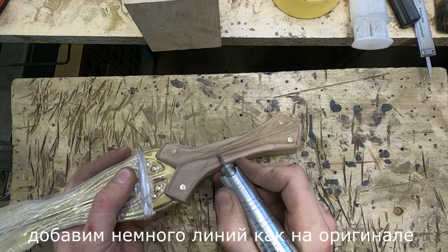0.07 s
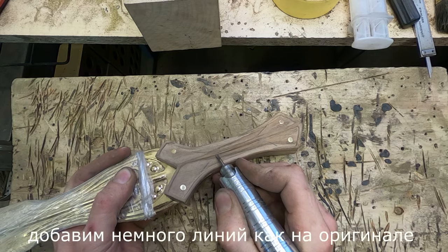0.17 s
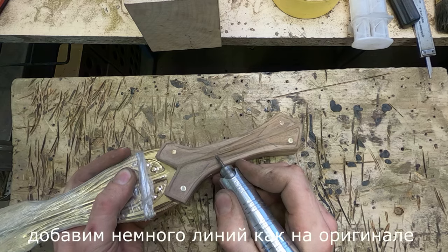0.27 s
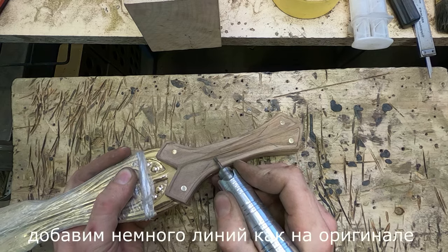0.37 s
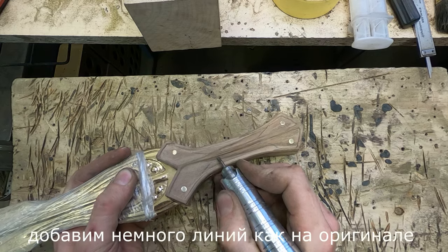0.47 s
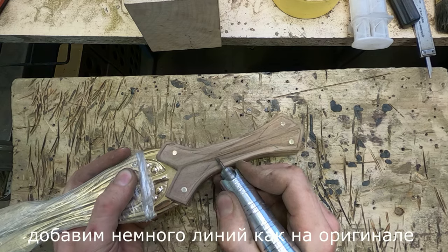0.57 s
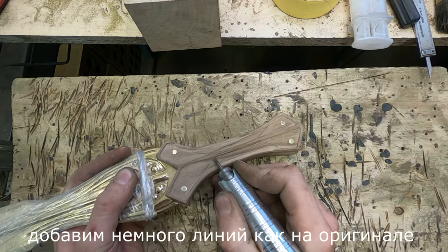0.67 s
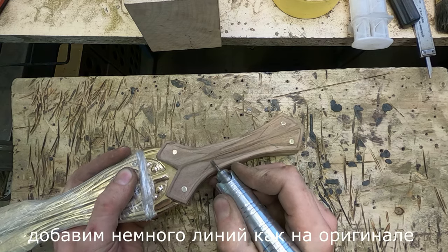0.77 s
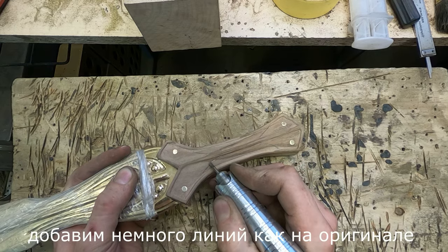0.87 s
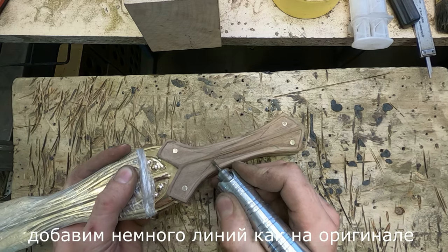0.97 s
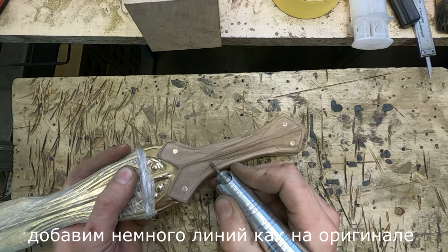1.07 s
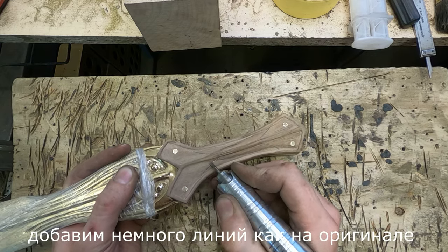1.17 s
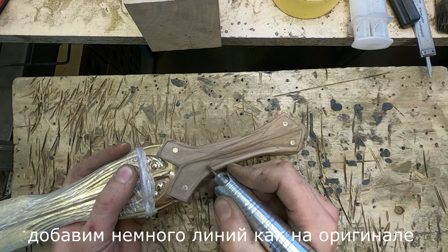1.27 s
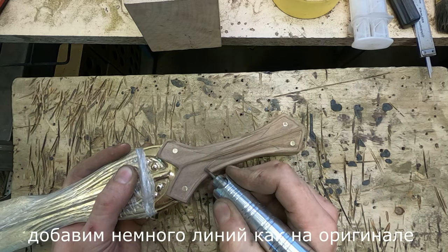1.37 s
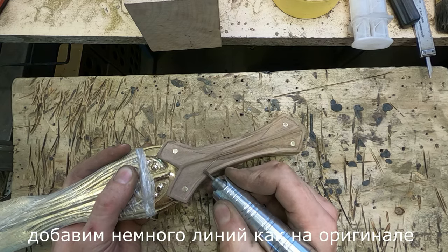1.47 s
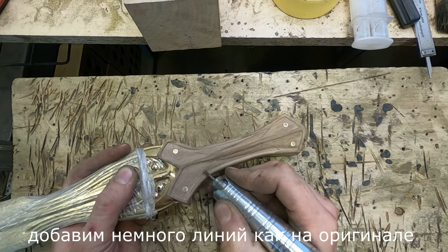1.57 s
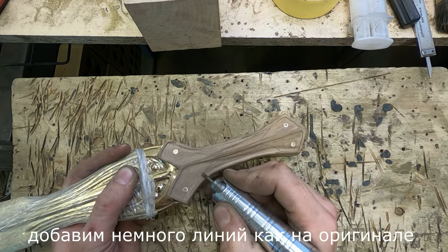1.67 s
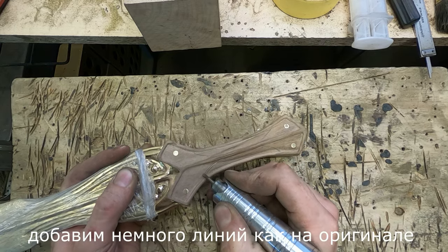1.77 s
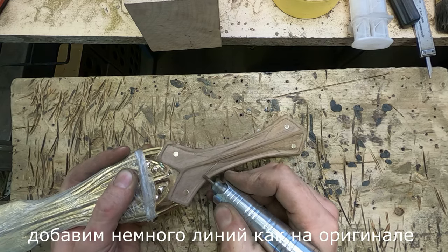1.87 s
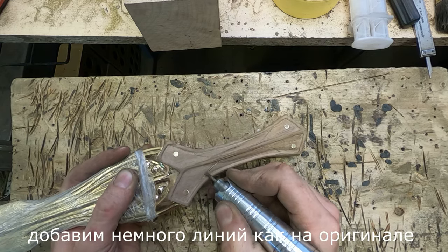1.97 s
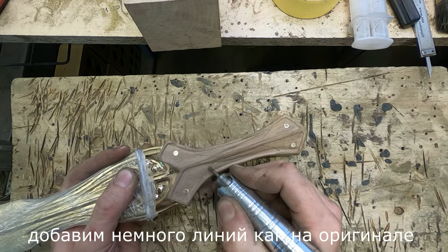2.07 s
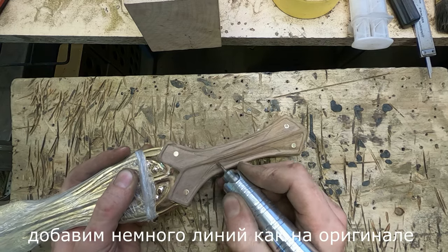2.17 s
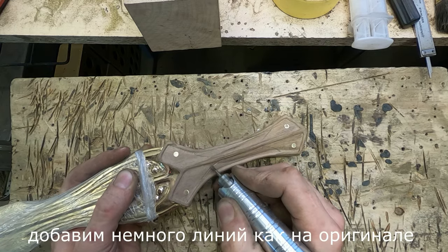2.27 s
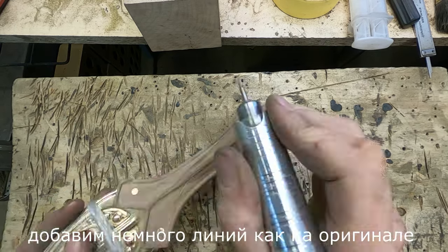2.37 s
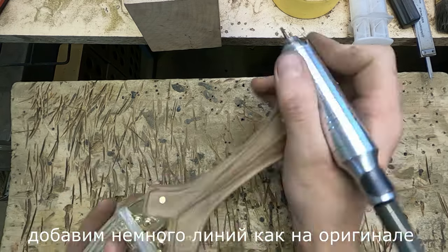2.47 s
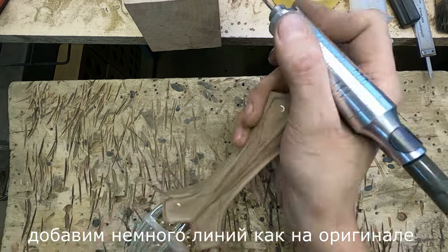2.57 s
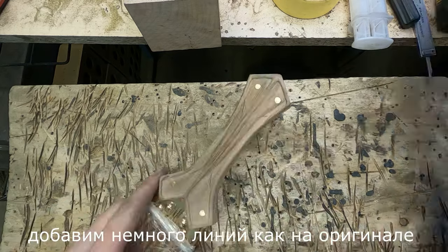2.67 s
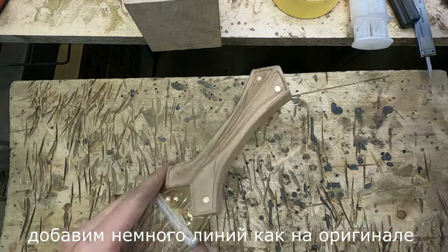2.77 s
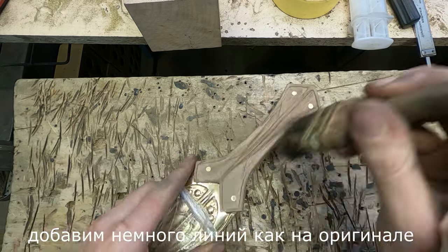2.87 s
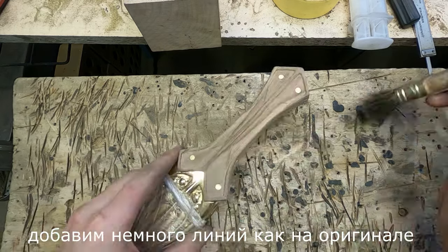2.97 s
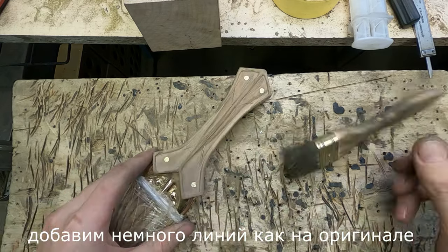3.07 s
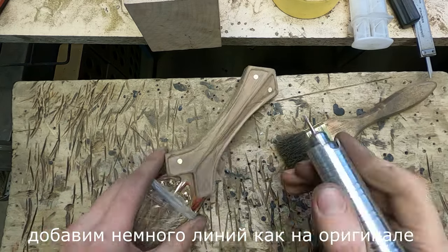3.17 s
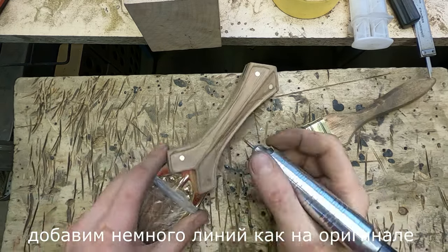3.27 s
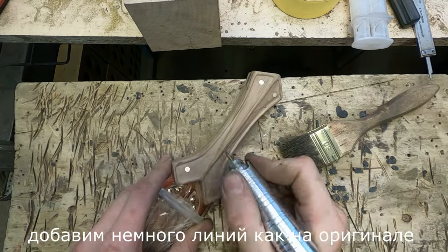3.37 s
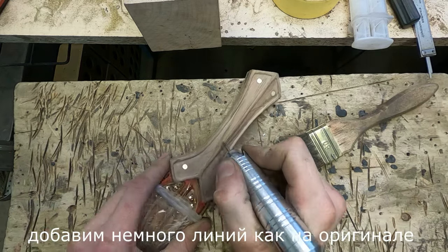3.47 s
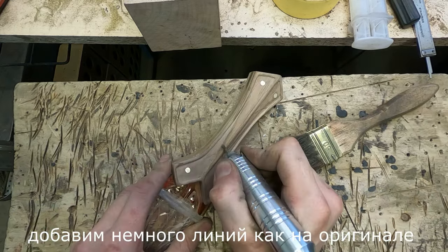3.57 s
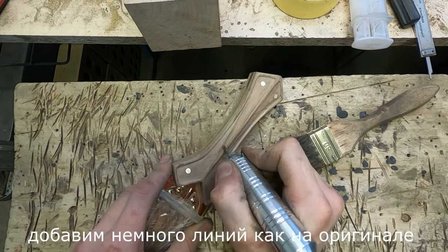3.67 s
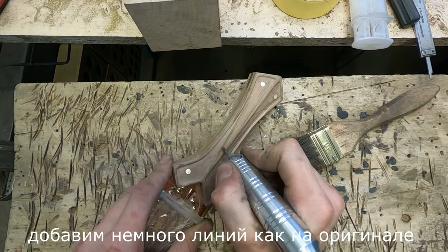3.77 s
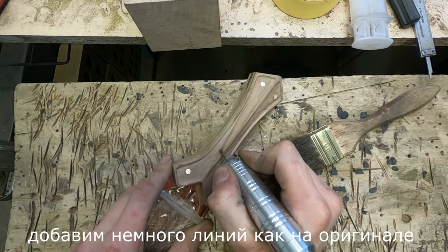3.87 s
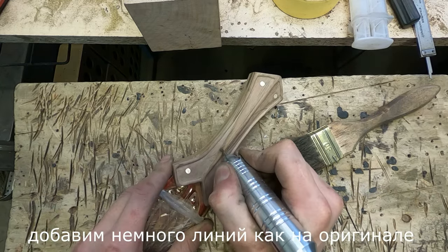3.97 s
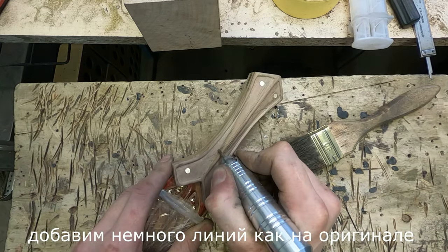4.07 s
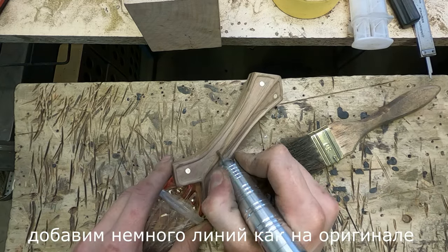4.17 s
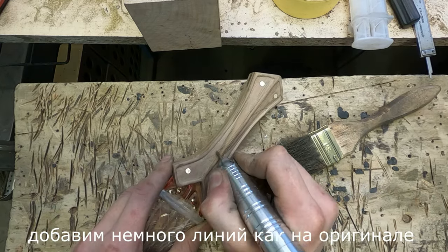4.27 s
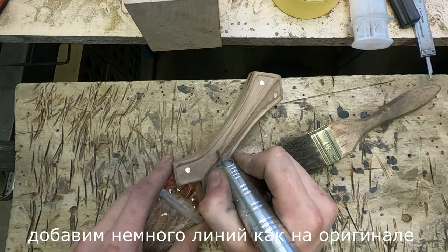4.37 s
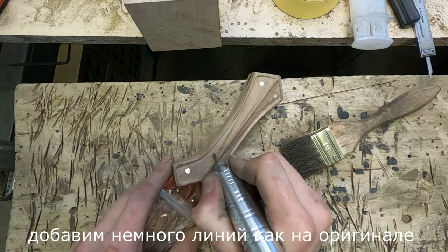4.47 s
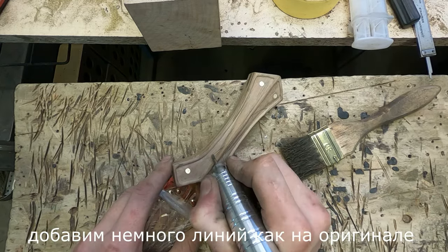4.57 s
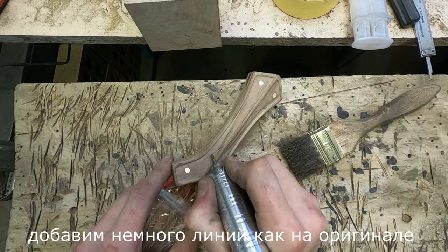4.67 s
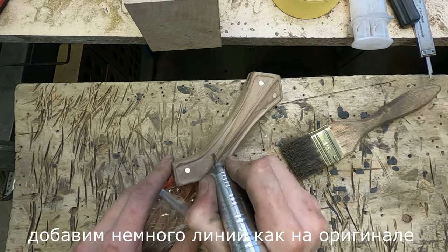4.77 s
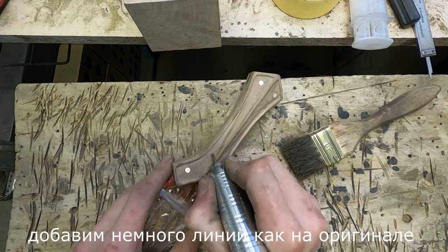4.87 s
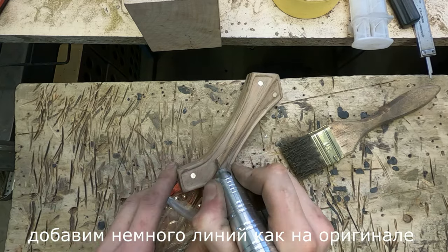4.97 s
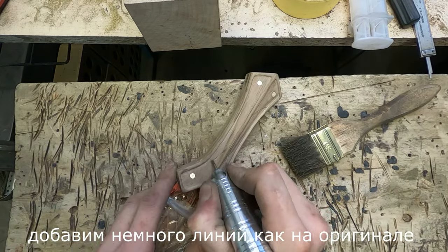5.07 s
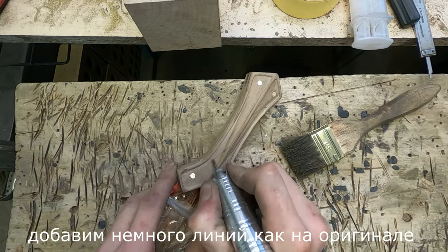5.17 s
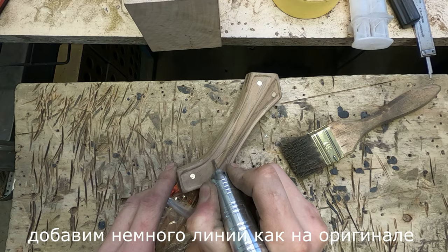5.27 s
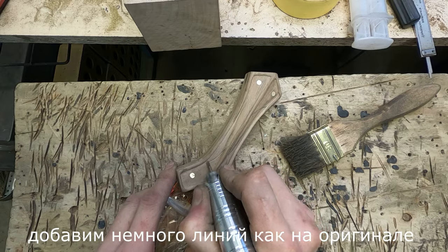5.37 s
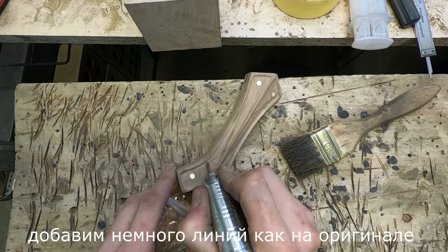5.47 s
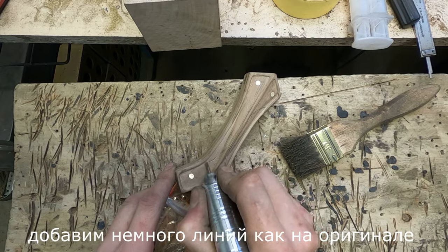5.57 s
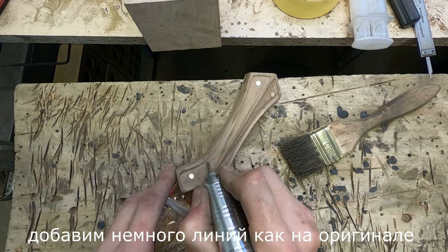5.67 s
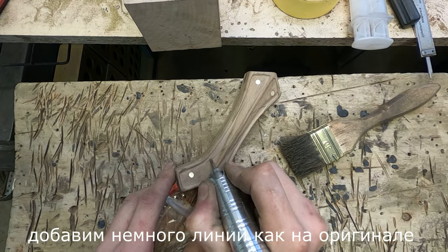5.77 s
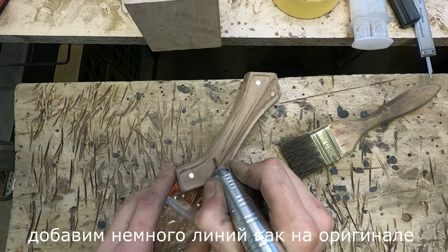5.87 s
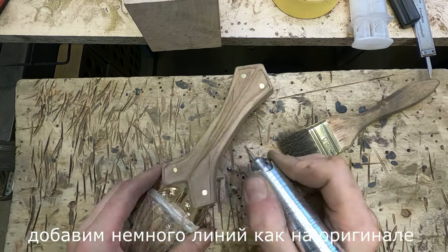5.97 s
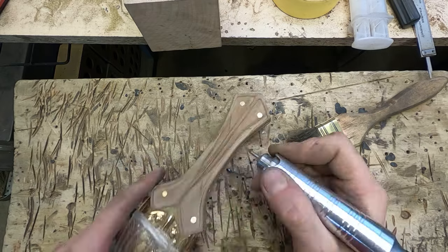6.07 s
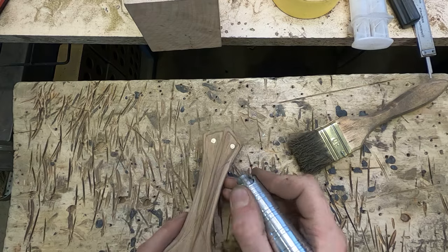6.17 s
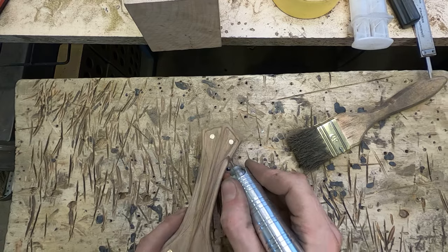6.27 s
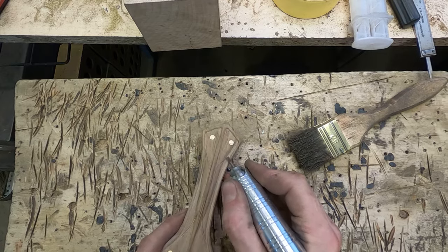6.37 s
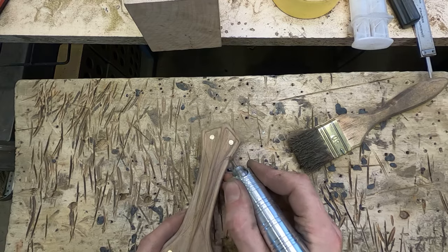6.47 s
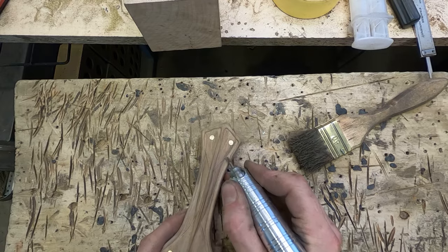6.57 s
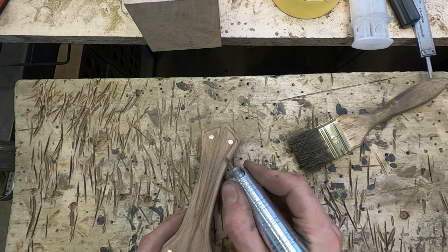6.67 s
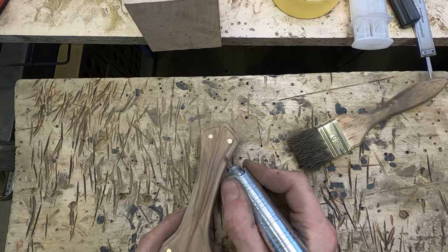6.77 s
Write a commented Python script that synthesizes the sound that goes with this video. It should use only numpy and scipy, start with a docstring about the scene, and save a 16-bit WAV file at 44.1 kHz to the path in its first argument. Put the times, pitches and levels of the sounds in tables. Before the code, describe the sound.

Close high whine of an engraving burr, surging and sagging stroke by stroke with steady hiss, broken by handling knocks and ending in short jabs.

```python
"""A flex-shaft rotary tool engraves lines in a wooden grip, close by on a workbench.
It starts with a low rattle of hum and slapping noise, then a high whine is heard: a row of cosines whose
pitch jumps at each stroke, with a spurt of hiss, and sags, throbbing. Rasp and hiss are shaped noise.
Between the lines the work is turned and brushed (the hiss changes colour), and things knock on the bench:
cracks of noise with ringing sines. Short jabs of the burr and a quiet room complete the scene."""
import sys
import numpy as np
from scipy import signal
from scipy.fft import rfft, irfft, next_fast_len
from scipy.io import wavfile
from scipy.ndimage import uniform_filter1d

SR = 44100
rng = np.random.default_rng(int(sys.argv[2]) if len(sys.argv) > 2 else 0)


def master(y):
    """Save y as 16-bit WAV."""
    cut = np.clip(np.atleast_2d(y).T, -1, 1)
    pcm = np.round(cut * 32767)  # scale
    wavfile.write(sys.argv[1], SR, pcm.astype(np.int16))


N = 300925
T = np.arange(N) / SR  # the time of every sample [s]

# strokes of the burr: (start [s], top pitch [Hz], sag [Hz/s], throbs [1/s], delay of the first crest [s],
# relative throb depth [0-1], relative spurt [dB], relative tone [dB], relative overtones [dB],
# fade of the tone [dB/s])
STROKES = [(.122, 796.4, 600, 28, 0.032, 0.62, -37.5, -44.5, -47.5, 56),
           (.326, 854, 580, 24.6, 0.028, 0.32, -37, -39, -43, 26),
           (.61, 827, 580, 30.4, 0.041, 0.81, -38, -40, -42.5, 53),
           (0.929, 822.6, 560, 25, 0.037, 0.63, -37, -39.5, -43.5, 33),
           (1.196, 842, 600, 33.5, 0.028, 0.63, -37.5, -34.5, -40.5, 54),
           (1.458, 856.6, 540.6, 26.3, .042, 0.7, -38.5, -34, -40.5, 57),
           (1.683, 910.5, 310.1, 25.6, 0.024, 0.45, -37, -35.5, -45.5, 16),
           (1.99, 891, 390, 27, 0.02006, .55, -37, -36.5, -46, -9.5),
           (3.488, 740, 900, 27, 0.033, 0.26, -35.5, -60, -53.5, 28),
           (3.736, 769, 560, 26, 0.04, 0.77, -35, -46, -50.5, 102),
           (4.015, 784.4, 500, 20.8, 0.033, 0.87, -38.5, -51, -51, 48),
           (4.283, 832.4, 550, 25.7, 0.021, 0.5, -39, -49.5, -49, 16),
           (4.557, 861.8, 540, 28.5, .048, 0.71, -38, -44.5, -49, 34),
           (5.13, 755, 600, 24, 0.046, 0.75, -39.5, -57.5, -50, 49),
           (5.316, 822.4, 550, 25.6, 0.033, 0.28, -35.5, -49.5, -48.5, 43),
           (5.698, 793, 560, 23.5, 0.031, 0.44, -38.5, -49, -48, 24),
           (6.339, 717, 500, 27, .03, 0.2, -36, -60, -56, 18),
           (6.688, 760, 300, 18.9, 0.035, 0.2, -33, -60, -56, 20)]
# what the grip radiates of the overtones: (frequency [Hz], relative level [dB])
GRIP = [(200, -28), (340, -7.5), (480, -10), (800, -2), (1150, -9), (1550, 6.5), (1950, 6.5), (2230, -13.5),
        (2550, 10), (2780, -7.5), (3000, -3.5), (3350, -3), (4200, -16), (7450, -5), (8200, -43)]

RATTLE_HZ, RATTLE_END = 108.05, .1035  # the low rattle: slaps per s, end [s]
TURNED_AT = 3  # when the work counts as turned [s]


def gain_of(db):
    """Decibels to amplitude."""
    return 10 ** (np.asarray(db) / 20)


def evened(x):
    """Scales to an rms (average strength) of 1."""
    return x / np.sqrt(np.mean(x ** 2) + 1e-20)


def read(points, hz):
    """Reads a spectrum at the given frequencies, with straight lines over log frequency."""
    f, value = np.transpose(points)
    return np.interp(np.log(hz + 1), np.log(f + 1), value)


def follow(rows):
    """Draws every column of a table over time, sample by sample."""
    s, *columns = np.transpose(rows)
    return [np.interp(T, s, c) for c in columns]


def add(mix, s, sound):
    """Mixes a sound in at a time."""
    part = mix[max(round(s * SR), 0):][:len(sound)]
    part += sound[:len(part)]


def coloured(x, points):
    """Filters a signal by a spectrum and scales it to rms 1."""
    count = x.shape[-1]
    size = next_fast_len(count)
    filter_gain = gain_of(read(points, np.fft.rfftfreq(size, 1 / SR)))
    return evened(irfft(rfft(x, size) * filter_gain, size)[..., :count])


def wander(hz):
    """Smooth random drift: noise with little above the given rate, at rms 1."""
    size = next_fast_len(N)
    smoothing = 1 + (np.fft.rfftfreq(size, 1 / SR) / hz) ** 4
    return evened(irfft(rfft(rng.standard_normal(size)) / smoothing, size)[:N])


def air(spectrum, patchy_db, bright_db=lambda t, hz: 0):
    """Stereo noise at rms 1 with a spectrum, drifting loud and soft patches and a moving colour."""
    # how alike the two sides are: (frequency [Hz], likeness [0-1])
    likeness = [(60, 0.87), (300, 0.99), (1000, 0.94), (2500, 1), (6000, 0.99), (10000, 0.42), (15000, 0.9)]
    # balance of the sides: (frequency [Hz], left minus right [dB])
    balance = [(300, 0), (1500, 0), (5000, 0), (10000, -2), (15000, -2.5)]
    # how far left is ahead of right: (frequency [Hz], phase [rad])
    phase_lead = [(0, 0.014), (7490, 0.05), (8610, 1), (9040, 0.46), (10500, 0.086), (16100, 0.79)]
    frames, hz = N // 128 + 5, np.fft.rfftfreq(512, 1 / SR)
    a, b, c, d, patches = rng.standard_normal((frames, 257, 5)).T
    patches = uniform_filter1d(patches, size=8, axis=1)
    patches = evened(uniform_filter1d(patches, size=2, axis=0))
    level_db = read(spectrum, hz)[:, None] + bright_db(np.arange(frames) * 128 / SR, hz[:, None])
    level_db = level_db + patchy_db * patches
    same = np.clip(read(likeness, hz), -1, 1)[:, None]
    left = a + 1j * b
    right = same * left + np.sqrt(1 - same ** 2) * (c + 1j * d)
    # each side takes half of the level and phase difference
    lean = (gain_of(read(balance, hz) / 2) * np.exp(.5j * read(phase_lead, hz)))[:, None]
    z = np.array([left * lean, right / lean]) * gain_of(level_db)
    return evened(signal.istft(z, nperseg=512, noverlap=384)[1][:, :N])


def workshop(x, wet_db=-22, decay=0.013):
    """Adds milliseconds of scattered reflections, different left and right; bass hardly scatters."""
    t = T[:SR // 8]
    bass_cut = signal.butter(2, 450, "high", fs=SR)
    tail = signal.lfilter(*bass_cut, rng.standard_normal((2, len(t))) * np.exp(-t / decay))
    tail /= np.linalg.norm(tail[0])
    return x + gain_of(wet_db) * signal.oaconvolve(x[None], tail, axes=1)[:, :N]


def rattle(first=0.0055, decay=0.24, between=0.23, growth_db=3):
    """The shaft hums and slaps its sleeve once a turn, harder and harder, as a low rattle."""
    # hum of the shaft: (multiple of the slap rate [1], level [dB])
    hum_parts = [(1, -48.5), (3, -47), (4, -43), (5, -49.5), (6, -66), (7, -54), (8, -46.5), (9, -50),
                 (11, -54)]
    # noise of the slaps: (frequency [Hz], relative level [dB])
    clatter_colour = [(90, -17), (300, -7.5), (700, -16), (1200, -2.5), (1550, -16), (2050, -6), (2500, -3),
                      (3200, 2), (4400, -10), (5800, -5), (7400, -4), (8500, -15), (12000, -16),
                      (15000, -31)]
    turns = RATTLE_HZ * (T - first)
    hum = sum(np.sqrt(2) * gain_of(db) * np.cos(2 * np.pi * (round(k) * turns + rng.random()))
              for k, db in hum_parts)
    # a slap is sudden and dies away before the next
    slaps = uniform_filter1d(between + np.exp(-(turns % 1) / decay), size=30)
    slaps = evened(slaps * gain_of(1.0 * wander(103)))
    force_db = -30 + growth_db * (np.minimum(T / RATTLE_END, 1) - .5)
    clatter = coloured(rng.standard_normal(N), clatter_colour) * slaps * gain_of(force_db)
    heard = np.clip((RATTLE_END - T) / 0.0016, 0, 1)
    return workshop(hum * heard, wet_db=-11, decay=0.017) + workshop(clatter * heard, wet_db=-4, decay=0.015)


def quiet_room():
    """The faint, steady background: low-pitched noise."""
    # room noise: (frequency [Hz], relative level [dB per Hz])
    room_colour = [(25, -15), (80, -3), (170, -0.5), (330, -4.5), (500, -28), (1500, -9), (4000, -23.5)]
    return air(room_colour, patchy_db=1) * gain_of(-81.5)


def spindle(spurt_rise=0.0017, spurt_length=0.038):
    """Pitch, throb and spurts: the pitch jumps at each stroke, then sags steadily towards its resting value."""
    pickup_s, rest_hz = .024, 592.3
    sway = .044  # share of the pitch by which a throb of 1 bends it
    hz, throb, spurt = np.full(N, 1. * rest_hz), np.zeros(N), np.zeros(N)
    for start, top_hz, sag, rate, delay, depth, spurt_db, *_ in STROKES:
        age = np.clip(T - start, 0, 1)
        sagging = np.maximum(top_hz - sag * (age - pickup_s), rest_hz)
        hz += np.minimum(age / pickup_s, 1) * (sagging - hz)
        # each throb is a round crest followed by a brief, sharp snag
        crest = np.pi * abs(np.cos(np.pi * rate * (T - start - delay))) - 2
        throb = np.where(T >= start, 0.814 * depth * crest, throb)
        spurt += gain_of(spurt_db) * np.minimum(age / spurt_rise, 1) * np.exp(-(age / spurt_length) ** 4)
    throb = uniform_filter1d(throb, size=120)
    return hz * (1 + sway * throb), throb, spurt


def pressure():
    """Contact and the strength of tone and overtones: each stroke swells as the burr bites, then changes."""
    # the burr is in the wood: (touches [s], starts to lift [s], weight of the hand [dB])
    cuts = [(.1, 1.742, 0), (1.812, 2.162, 0), (2.214, 2.324, -7), (3.705, 4.756, 0), (4.815, 4.942, 0),
            (5.11, 5.96, 0)]
    touch_s, lift_s, swell_s = 0.029, .024, 0.035
    contact = np.zeros(N)
    for touch, lift, db in cuts:
        held = np.minimum((T - touch) / touch_s, 1 - (T - lift) / lift_s)
        contact += gain_of(db) * np.clip(held, 0, 1) ** 2
    base, upper = np.zeros((2, N))
    for start, *_, tone_db, overtone_db, fade in STROKES:
        age = np.clip(T - start, 0, 1)
        swell, faded_db = np.minimum(age / swell_s, 1), fade * (age - swell_s)
        # the overtones follow only a share of the tone's fade, hardly any once the work is turned
        share = 0.8 if start < TURNED_AT else 0.042
        base += swell * (gain_of(tone_db - faded_db) - base)
        upper += swell * (gain_of(overtone_db - share * faded_db) - upper)
    # the grain of the wood makes the overtones swell and drop out
    grain = gain_of(1.08 * wander(12.7))
    # a light touch loses the fundamental sooner than the overtones
    return contact, contact * base, np.sqrt(contact) * upper * grain


def judder(contact, base, growth=0.11, reference_db=-46.5):
    """The bench shakes under a cut: low noise, a little stronger when the tone is strong."""
    # noise of the bench: (frequency [Hz], relative level [dB per Hz])
    judder_colour = [(25, -22), (90, -25), (220, -29), (325, 12.5), (420, -3), (700, 10), (1200, -17)]
    strength = (abs(base) / gain_of(reference_db) + 1e-9) ** growth
    return air(judder_colour, patchy_db=5.5) * contact * strength * gain_of(-69)


def whine(hz, throb, contact, base, upper, throb_db=5.5, overtone_throb_db=3.5, flutter_db=1,
          tone_db=1.0, overtone_db=-1.5, scrape_db=-4, slip=0.0047):
    """The burr bites twice a turn; when it runs loose the bites differ, half orders appear and it scrapes."""
    # how loosely the burr runs: (time [s], half-order share [1], pitch jitter as a share of the pitch [1],
    # scraping noise [0-1])
    chatter = [(.2, .3, 0.015, 0.27), (1.3, .08, 0.008, 0.15), (2.3, .08, 0.014, 0.41),
               (3.8, .4, .025, 0.41), (4.6, .3, 0.02088, 0.36), (5.25, .9, 0.023, 0.49),
               (5.9, .7, 0.02, 0.3)]
    # the grip once the work is turned and held by its neck: (frequency [Hz], relative level [dB])
    grip_turned = [(200, -32), (360, -9), (520, 1), (1100, -10), (1520, 4.5), (1760, -5), (1950, 9),
                   (2250, -8.5), (2550, 3.5), (3000, 4), (3350, 3), (4000, -7.5), (6500, -17), (7100, -12),
                   (7500, 8), (7900, -0.5), (8400, 1), (9200, -18)]
    loose, jitter, scraping = follow(chatter)
    bite_cycles = np.cumsum(hz * (1 + jitter * wander(256))) / SR
    # each bite lands a little early or late, which smears the high orders
    uneven_bites = bite_cycles + slip * scraping * wander(270)
    overtones, power = np.zeros(N), np.zeros(N)
    for k in np.arange(1, 23) / 2:
        if k != 1:  # the fundamental is made separately below
            before, after = read(GRIP, k * hz[T < TURNED_AT]), read(grip_turned, k * hz[T >= TURNED_AT])
            size = gain_of(np.concatenate([before, after])) * (loose if k % 1 else 1)
            overtones -= size * (1 + 0.42 * wander(60)) * np.cos(2 * np.pi * k * uneven_bites)
            power += size ** 2 / 2
    bite_wave = np.cos(2 * np.pi * bite_cycles)
    tone = -np.sqrt(2) * bite_wave * base * gain_of(tone_db + throb_db * throb)
    overtones *= (1 - scraping ** 2) / np.sqrt(power) * gain_of(overtone_db + overtone_throb_db * throb)
    scrape = air(GRIP, patchy_db=6.0) * scraping * (1 + 1.0 * bite_wave)
    scrape *= gain_of(scrape_db + 0.5 * throb)
    # the fundamental scatters more than the overtones here
    cutting = workshop(tone, wet_db=-27.5) + workshop(upper * overtones, wet_db=-51.0) + upper * scrape
    return cutting * gain_of(flutter_db * wander(90)) + judder(contact, base), bite_cycles


def handling(t, hz):
    """The colour in dB that the moving hands give the hiss: a shaded band and gliding swishes."""
    # the hand's hold shades the hiss around 11 kHz: (time [s], change [dB])
    shade_curve = [(2.3, -5.5), (2.5, -1), (3.5, 0), (4.5, 2), (6.8, 2.5)]
    # swishes while the work is turned and brushed: (time [s], half length [s], centre [Hz],
    # glide [Hz/s], half width [Hz], boost of the band before the hiss is evened out [dB])
    swish_list = [(2.424, 0.044, 10240, -22000, 1098, 10.5), (2.495, .018, 6550, 0, 1200, 12.5),
                  (2.544, 0.058, 13050, 0, 1300, 12), (2.67, 0.061, 12500, -8000, 1200, 13.5),
                  (2.97, 0.094, 10200, 18000, 1300, 9), (3.24, .077, 12130, 8000, 1400, 9)]
    colour_db = np.interp(t, *np.transpose(shade_curve)) * np.exp(-((hz - 11000) / 2200) ** 2)
    for s, length, centre, glide, width, db in swish_list:
        off_centre = (hz - centre - glide * (t - s)) / width
        colour_db = colour_db + db * np.exp(-((t - s) / length) ** 4 - off_centre ** 2)
    return colour_db


def grinding(bite_cycles, throb, spurt, contact, bite=0.59, rasp_db=-1.0, cutting_db=1.5, hiss_db=5.0,
             spurt_db=-0.5):
    """Fibres tear at every bite with a rasp; the spindle hisses, most when it surges."""
    # the running tool: (time [s], relative level of the rasp [dB], relative level of the hiss [dB])
    running = [(0.13, -47.5, -45), (0.33, -47.5, -44.5), (0.97, -47, -46), (1.15, -47, -45),
               (2.2, -49, -44.5), (2.55, -53.5, -44), (2.68, -58, -45), (2.89, -71, -49),
               (3.2, -55.5, -51.5), (3.37, -52.5, -52.5), (3.76, -52, -47), (4.71, -48, -44.5),
               (4.95, -49, -45), (5.78, -44.5, -45), (5.98, -47.5, -46.5), (6.17, -52.5, -51),
               (6.82, -44.5, -49)]
    # noise of the rasp: (frequency [Hz], relative level [dB per Hz])
    rasp_colour = [(2500, -35.5), (3300, -10.5), (4200, -11), (4900, -13), (5300, 1.5), (6400, -0.5),
                   (7200, 1.5), (7480, 4.5), (7850, -9.5), (10000, -4), (13000, -38)]
    # noise of the hiss: (frequency [Hz], relative level [dB per Hz])
    hiss_colour = [(200, -43), (700, -18.5), (1100, -14.5), (2500, -16.5), (4000, -10.5), (6000, -4),
                   (8500, -4), (9800, -2.5), (11000, 4), (12500, 2), (14000, 6.5), (16000, 3)]
    # noise of the spurts: (frequency [Hz], relative level [dB per Hz])
    spurt_colour = [(500, -35.5), (1200, -12), (3000, -15), (6000, -3.5), (7800, -9), (9000, 3.5),
                    (12000, 4), (16000, -0.5)]
    rasp_level, hiss_level = follow(running)
    gate = 1 + bite * np.cos(2 * np.pi * bite_cycles)
    gate = evened(gate * gain_of(1.7 * throb + 0.46 * wander(120)))
    rasp = air(rasp_colour, patchy_db=3.5) * gate * gain_of(rasp_level + rasp_db + cutting_db * contact)
    hiss = air(hiss_colour, patchy_db=2.4, bright_db=handling)
    # evened out over 2000 samples, so that handling changes mainly its colour
    hiss /= np.sqrt(uniform_filter1d((hiss ** 2).mean(0), size=2000))
    hiss *= gain_of(hiss_level + hiss_db + put_aside() + 1.07 * wander(150))
    return rasp + hiss + air(spurt_colour, patchy_db=4.5) * spurt * gain_of(spurt_db)


def bumps():
    """Soft bumps of hands and work: a few low cycles that swell and die away."""
    # bumps: (time [s], level [dB], pitch [Hz])
    bump_list = [(1.306, -57, 317.5), (2.786, -63, 209), (2.971, -53, 330), (2.984, -61, 180),
                 (3.09, -55, 171), (3.104, -56.5, 324), (3.316, -60.5, 170), (3.5, -64.5, 304),
                 (3.86, -61, 162.4), (5.589, -59, 168.3), (6.212, -66, 170), (6.481, -57, 328)]
    out, t = np.zeros(N), T[:SR // 6]
    u = t / 0.009
    for s, db, hz in bump_list:
        add(out, s, gain_of(db) * u * np.exp(1 - u) * np.sin(2 * np.pi * hz * t))
    return out


def knocks(crack_decay=0.005, tail=0.21, tail_decay=0.012, ring=0.32):
    """A knock on the bench is a hard crack of noise with a short tail, and the bench rings in sines."""
    # knocks: (time [s], peak of the crack [dB], brightness [dB per octave], length factor [1])
    knock_list = [(2.606, -23.5, -0.5, 0.51), (2.7498, -29, 12, 0.49), (2.761, -45.5, -4, 3.6),
                  (2.792, -39.5, 1, 1.5), (2.959, -26.5, -2, 0.6), (3.098, -41, -7, 0.91),
                  (3.1364, -23, 8.5, 0.33), (3.143, -35, 1.5, 0.56), (3.153, -35, -3, 0.72),
                  (6.113, -53, -4, 0.73), (6.2116, -27, -1.5, 0.48)]
    # ringing of the bench: (frequency [Hz], relative level [dB], time to fall 60 dB at length factor 1 [s])
    bench = [(618, -12, 0.1), (1103, -2.5, 0.12), (1300, -37, 0.095), (1922, -9.5, 0.21),
             (2570, -12.5, 0.25), (2760, -33, 0.11), (3190, 5.5, 0.013), (3600, -46, 0.085),
             (3854, -21, 0.1)]
    # noise of the crack: (frequency [Hz], relative level [dB per Hz])
    crack_colour = [(30, -49), (100, -22), (200, -10), (400, -16.5), (800, 6.5), (1700, 2), (2100, -2),
                    (2600, 4), (3200, -2), (3800, -4.5), (5000, -19), (9000, -11.5), (16000, -28)]
    out, t = np.zeros(N), T[:SR // 6]
    for s, db, tilt_db, length in knock_list:
        colour = [(f, level + tilt_db * np.log2(f / 1500)) for f, level in crack_colour]
        fade = np.exp(-t / (crack_decay * length)) + tail * np.exp(-t / tail_decay)
        crack = coloured(rng.standard_normal(len(t)), colour) * fade
        modes = sum(gain_of(level - 60 * t / (t60 * length)) * np.sin(2 * np.pi * (f * t + rng.random()))
                    for f, level, t60 in bench)
        add(out, s, gain_of(db) * (crack / abs(crack).max() + ring * modes / abs(modes).max()))
    return out


def put_aside(at=2.727, dip_db=-11, recovery_s=0.056):
    """The hiss drops suddenly as the handpiece is put aside, then recovers: a dip in dB."""
    dip = (T > at) * np.exp(-((T - at) / recovery_s) ** 2)
    return dip_db * uniform_filter1d(dip, size=400)


def jabs(ring_hz=190, jitter=0.037, grit=1.1):
    """The burr pecks at the wood: uneven bites ring whichever part of the grip it meets."""
    # jabs: (time [s], length [s], relative level [dB], pitch at start [Hz], pitch at end [Hz],
    # ringing resonance [Hz], its boost [dB])
    jab_list = [(3.667, 0.039, -49, 566, 522, 1137, 16.5), (5.065, 0.075, -50.5, 652, 555, 1120, 13),
                (6.387, 0.059, -48, 702, 658, 715, 9.5), (6.462, 0.042, -42.5, 654, 627, 2650, -3),
                (6.564, 0.0438, -49.5, 635, 570, 2360, 2), (6.626, 0.035, -45.5, 603, 556, 1130, 21),
                (6.68, 0.052, -48.5, 648, 796, 776, 7.5)]
    out = np.zeros(N)
    f = np.arange(50, 12000, 50)
    for s, length, db, start_hz, end_hz, centre, boost_db in jab_list:
        t = T[:int((length + .03) * SR)]
        hz = np.interp(t, [0, length], [start_hz, end_hz]) * (1 + jitter * wander(360)[:len(t)])
        bite_cycles = np.cumsum(hz) / SR
        bites = evened(sum(np.cos(2 * np.pi * k * bite_cycles) for k in range(1, 12)))
        bites = bites + grit * rng.standard_normal(len(t))
        resonance = boost_db / (1 + ((f - centre) / ring_hz) ** 2)
        colour = read(GRIP, f) + resonance + 5 * np.exp(-((f - 620) / 200) ** 2)
        swell = np.minimum(t / 0.0074, 1) * np.exp(-np.maximum(t - 0.74 * length, 0) / 0.012)
        add(out, s, gain_of(db) * swell * coloured(bites, np.transpose([f, colour])))
    return out


def scene():
    """The low rattle gives way to the high whine; knocks, jabs and a quiet room lie around it."""
    hz, throb, spurt = spindle()
    contact, base, upper = pressure()
    tone, bite_cycles = whine(hz, throb, contact, base, upper)
    engraving = (tone + grinding(bite_cycles, throb, spurt, contact)) * (T > RATTLE_END)
    return rattle() + engraving + workshop(knocks() + bumps() + jabs(), wet_db=-11.0) + quiet_room()


def record(dry):
    """Cuts off the highest treble, above about 15.8 kHz, with a steep filter."""
    treble_cut = signal.firwin(701, 15820, window=("kaiser", 8), fs=SR)
    return signal.oaconvolve(dry, treble_cut[None], "same")


dry = scene()
out = record(dry)
master(out)
```